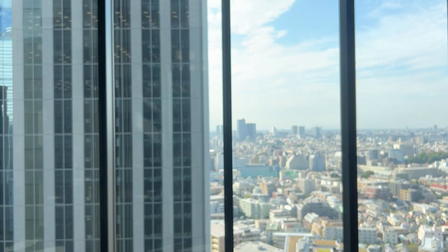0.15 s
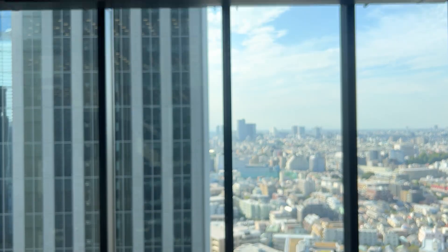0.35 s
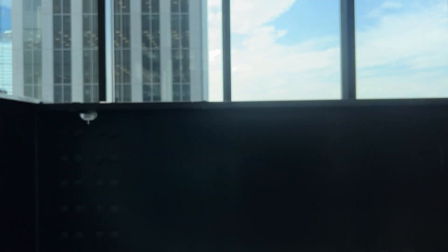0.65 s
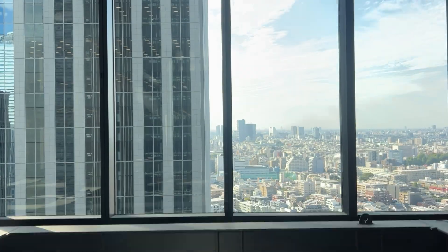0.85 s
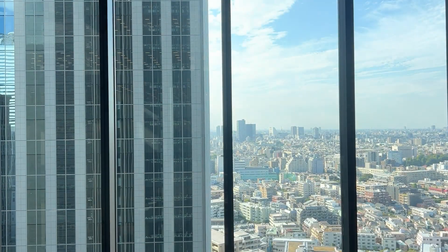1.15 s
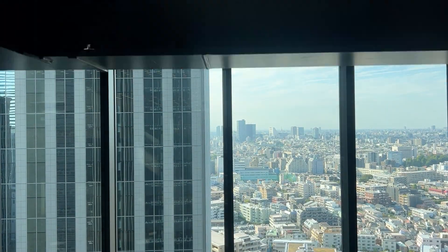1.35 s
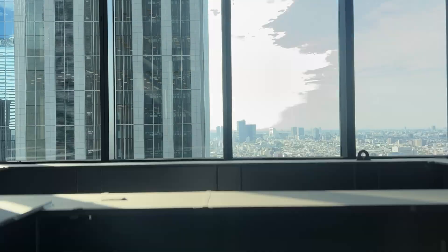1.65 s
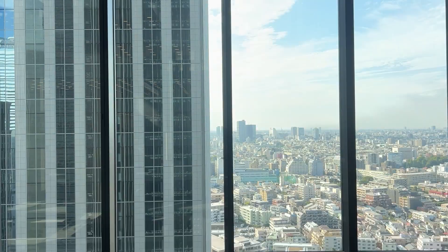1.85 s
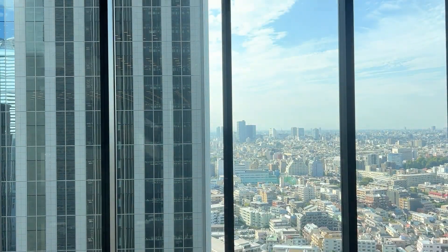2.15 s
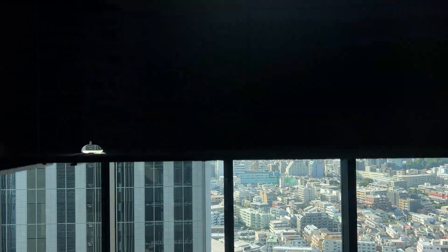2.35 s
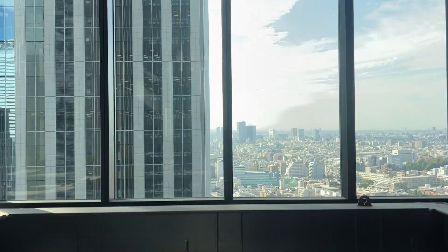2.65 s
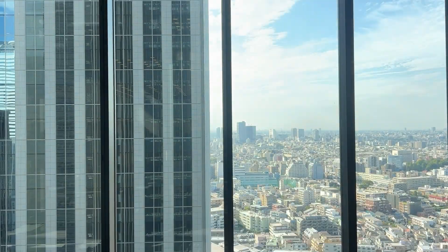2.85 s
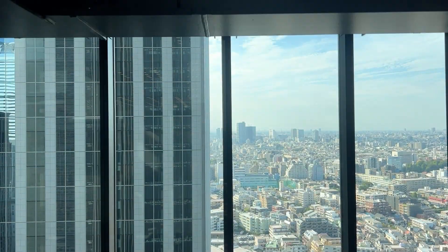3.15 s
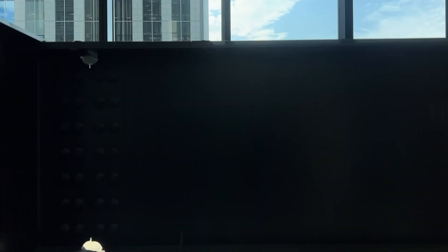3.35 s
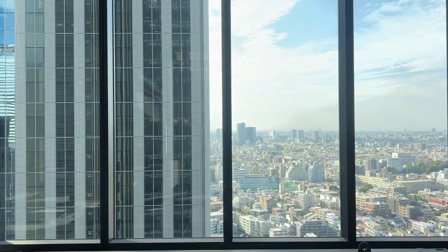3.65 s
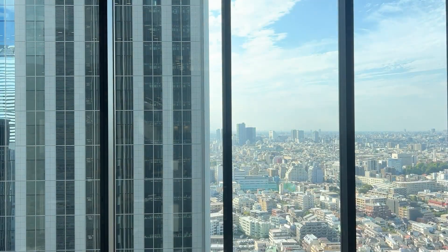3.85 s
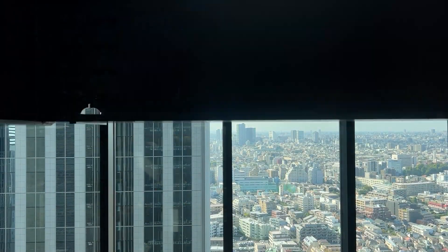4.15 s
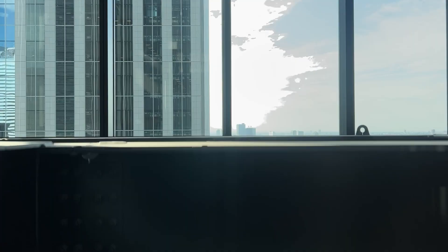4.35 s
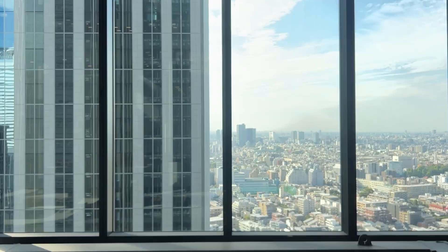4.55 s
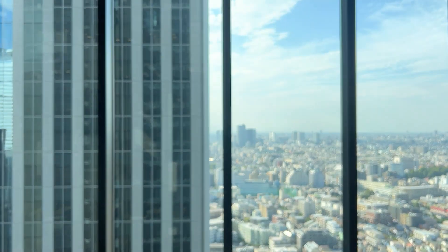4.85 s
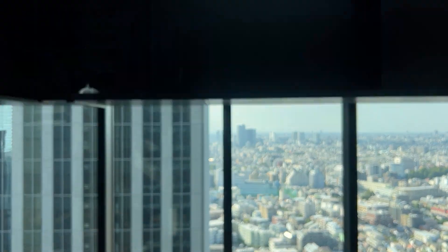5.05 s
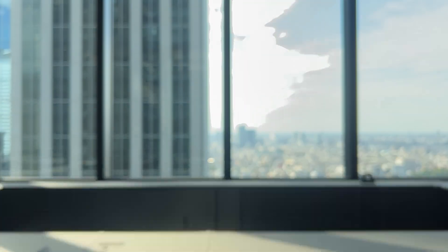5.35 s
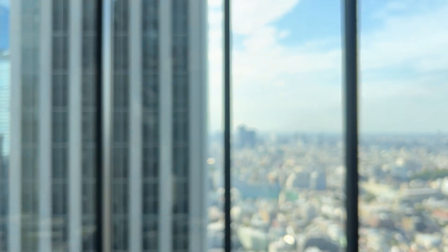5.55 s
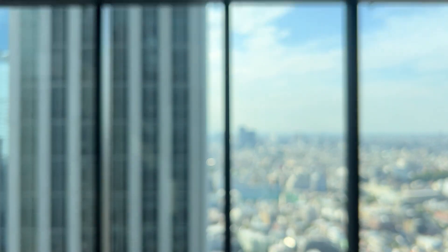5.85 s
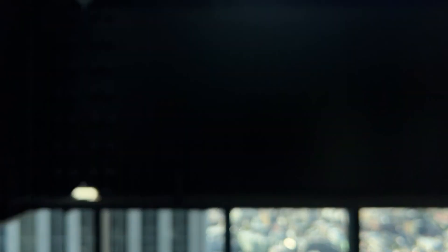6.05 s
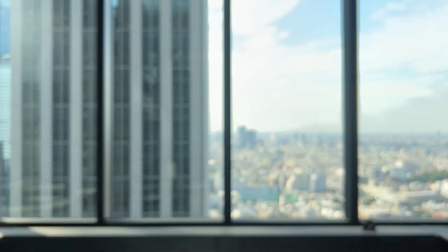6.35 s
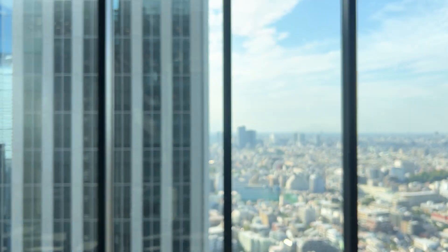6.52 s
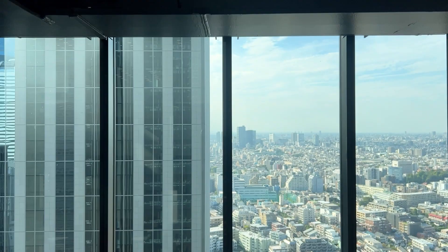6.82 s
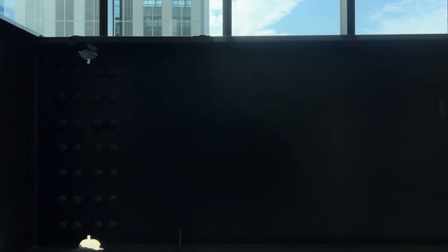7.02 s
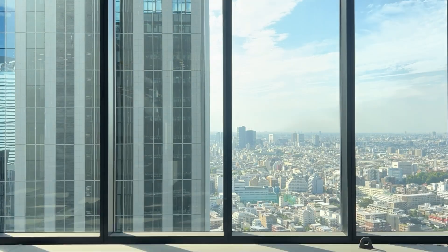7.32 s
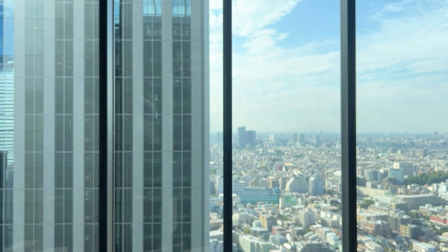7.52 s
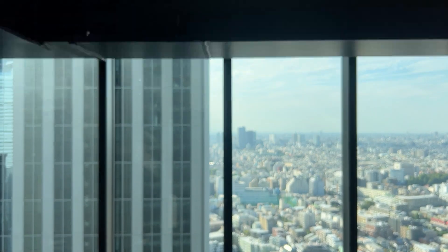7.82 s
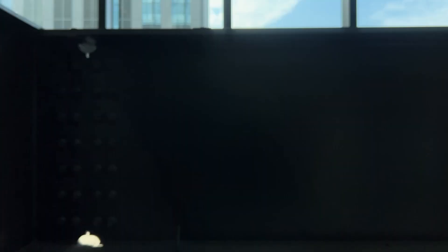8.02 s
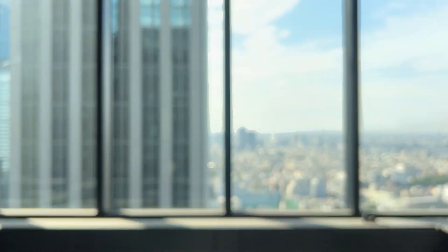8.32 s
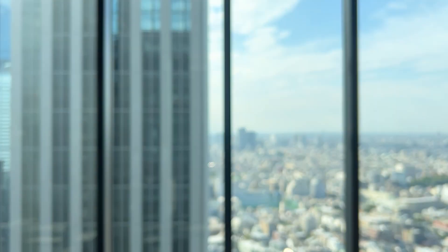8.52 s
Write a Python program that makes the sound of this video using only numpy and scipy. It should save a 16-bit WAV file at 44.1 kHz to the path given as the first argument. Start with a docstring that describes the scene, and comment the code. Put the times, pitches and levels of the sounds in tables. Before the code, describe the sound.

A moving elevator car hums and rumbles steadily from inside, with a few dull knocks, the hum sagging as it slows near the end.

```python
"""Riding a glass elevator

Inside the car as it climbs at speed, on a hand-held two-port microphone. The guide rollers hum through
the car over a low rumble, ringing panels and the hiss of the ventilation. Near the end the car slows:
the hum sags and the air noise grows. Dull knocks, a thin whistle and a few short hisses pass by."""
import sys
import numpy as np
from scipy import signal
from scipy.fft import rfft, irfft, next_fast_len
from scipy.io import wavfile
from scipy.ndimage import uniform_filter1d

SR = 44100
rng = np.random.default_rng(int(sys.argv[2]) if len(sys.argv) > 2 else 0)


def materialize(psi):
    """Save the field psi as 16-bit PCM at rate SR to the path in sys.argv[1].

    A 1-D psi becomes a single channel; in a 2-D psi each row is a channel.
    """
    bounded = np.clip(np.atleast_2d(psi).T, -1, 1)
    quanta = np.round(bounded * 32767).astype(np.int16)
    wavfile.write(sys.argv[1], SR, quanta)


N = 382770

# how alike the car sounds at the two ports: (frequency [Hz], correlation [0-1])
PORT_LIKENESS = [(25, .999), (45, .997), (60, .97), (75, .93), (100, .8), (130, .6), (180, .82), (300, .84),
                 (520, .25), (890, .15), (1520, .4), (2600, .5), (4500, .1), (6000, .25), (8000, .6),
                 (11000, .95)]
# balance at the microphone: (frequency [Hz], left minus right [dB])
PORT_BALANCE = [(30, 2.5), (50, 0.5), (75, 0), (120, -3), (300, 0), (520, -1), (890, 0.5), (1520, -2.5),
                (2600, -4.5), (5000, -4), (7500, -5), (12000, 0.5)]
# rumble of the rollers on the rails: (time [s], level [dB])
RUMBLE_LEVEL = [(0, -39), (.3, -38.5), (1.1, -39.5), (1.5, -39.5), (2.2, -36.5), (2.6, -40), (3.1, -35.5),
                (3.5, -40), (4.3, -38), (4.8, -40), (5.3, -38.5), (5.8, -43), (6.2, -40.5), (7.3, -38.5),
                (7.9, -39.5), (8.45, -42), (8.68, -39.5)]
# bottom end of that rumble: (time [s], level [dB])
BOTTOM_LEVEL = [(0, -43.5), (.7, -43), (1.5, -44), (2.2, -42), (2.9, -44.5), (3.6, -45), (4.3, -39.5),
                (4.9, -40), (5.3, -41), (5.8, -45), (6.2, -40), (6.7, -39.5), (7.3, -41.5), (7.9, -46),
                (8.4, -41), (8.68, -46)]
# ventilation hiss: (time [s], level [dB])
VENT_LEVEL = [(0, -58), (1.6, -58.5), (2.2, -57.5), (3.6, -58), (4.25, -56.5), (4.9, -57.5), (5.5, -55),
              (6.1, -57), (6.9, -53.5), (7.5, -54), (7.9, -54), (8.1, -53), (8.68, -52.5)]


def roller_hum():
    """Multiples of the rollers' turn: one strong hum throbs once a turn, weaker ones swell and fade."""
    # the strong hum: (time [s], level [dB])
    hum_level = [(0, -54), (.3, -34.5), (.75, -38), (1.35, -32.5), (1.75, -37), (2.35, -33.5), (2.9, -38),
                 (3.3, -39.5), (4.25, -34.5), (4.6, -42.5), (5, -33), (5.36, -42), (5.55, -31.5),
                 (6.2, -32.5), (6.4, -34.5), (6.8, -36), (7, -29), (7.27, -29), (7.37, -54.5), (8.1, -44.5),
                 (8.38, -35.5), (8.68, -44)]
    # its throb: (time [s], depth [0-1])
    throb_depth = [(0, 0.43), (3.1, 0.42), (3.5, 0.2), (5.4, 0.09), (7, 0.17)]
    # the weaker lines, before swell and resonance: {multiple of the turn: level [dB]}
    orders = {7: -58, 8: -59, 10: -49.5, 11: -58.5, 13: -54, 14: -59.5, 16: -53.5, 17: -52, 18: -54.5, 22:
              -53.5, 23: -60, 24: -59.5, 25: -59.5, 26: -55, 28: -58, 37: -62.5, 39: -63.5, 48: -65.5}
    cruise_hz, main_order, throb_peak_s = 6.407, 20, 0.1
    brake_s, ease_s, slowing_hz_per_s = 6.9, 0.421, 1.05  # braking builds over ease_s, then holds
    car_hz, car_width_hz = 126.1, 3.2  # the car's main resonance lifts a line sliding through it
    braking = np.maximum(np.arange(N) / SR - brake_s, 0)
    braked_s = np.where(braking < ease_s, braking ** 2 / (2 * ease_s), braking - ease_s / 2)
    turn_hz = cruise_hz - slowing_hz_per_s * braked_s
    turns = np.cumsum(turn_hz) / SR
    throb = 1 + over_time(throb_depth) * np.cos(2 * np.pi * (turns - cruise_hz * throb_peak_s))
    sway, *swells = wander(top_hz=3.0, count=len(orders) + 1)
    main = np.sin(2 * np.pi * (main_order * turns + rng.random()) + 0.28 * sway)
    out = sides(lean_db=-4.5) * gain_of(over_time(hum_level)) * throb * main
    for (order, db), swell in zip(orders.items(), swells):
        lift = 1 + 5 / (1 + ((order * turn_hz - car_hz) / car_width_hz) ** 2)
        line = lift * gain_of(db + 3.1 * swell) * np.sin(2 * np.pi * (order * turns + rng.random()))
        out += sides(at_hz(PORT_BALANCE, order * cruise_hz)) * line
    return np.sqrt(2) * out


def rail_rumble():
    """Rollers running on the rails: a low rumble whose bottom end rises and falls on its own."""
    # colour of the rumble: (frequency [Hz], relative density [dB])
    rumble_colour = [(75, -45), (91, -21.5), (109, -1), (125, -4.5), (210, -16.5), (309, -21), (364, -26),
                     (700, -44), (910, -75.5), (1540, -120)]
    # colour of its bottom end: (frequency [Hz], relative density [dB])
    bottom_colour = [(12, -69), (20, -32.5), (53, -7), (73, 1.5), (91, -17), (105, -44.5), (200, -100)]
    rumble = gain_of(over_time(RUMBLE_LEVEL)) * port_noise(rumble_colour, patchy_db=1.1, size=4096)
    bottom = gain_of(over_time(BOTTOM_LEVEL)) * port_noise(bottom_colour, patchy_db=2.5, size=4096)
    return rumble + bottom


def car_panels():
    """Each panel picks its own narrow band out of the shaking and follows the level of what drives it."""
    # panel resonances: (frequency [Hz], width [Hz], level at average drive [dB])
    panel_modes = [(48.4, 16, -59), (65.2, 1.6, -52), (84.5, 9.8, -50.5), (105.5, 6.1, -45.5),
                   (126.8, 13, -50.5), (181, 6.8, -63), (238.84, 5, -57), (307.9, 7, -58.5), (746, 36, -68),
                   (847, 17, -68.5), (895, 10, -69.5), (1095, 37, -73.5), (1878, 160, -73)]
    bottom_db, rumble_db, vent_db = map(over_time, (BOTTOM_LEVEL, RUMBLE_LEVEL, VENT_LEVEL))
    out = np.zeros((2, N))
    for hz, width, db in panel_modes:
        shake, likeness = rng.standard_normal((2, N)), at_hz(PORT_LIKENESS, hz)
        shake[1] = likeness * shake[0] + np.sqrt(1 - likeness ** 2) * shake[1]
        drive_db = bottom_db if hz < 92 else rumble_db if hz < 700 else .5 * vent_db
        level = gain_of(db + drive_db - drive_db.mean())
        out += level * sides(at_hz(PORT_BALANCE, hz)) * narrow_band(shake, hz, width)
    return out


def knock(db, hz, upper_hz, bright_db, lean_db, drop, thud_db):
    """A blow through a stiff panel: bending waves spread, so the pitch drops fast; body modes ring too."""
    # modes in every knock: (frequency [Hz], relative level [dB], t60 [s], kind [1 bright, 0 thud])
    body_modes = [(125, -3, .11, 0), (200, -3, .05, 0), (320, -6, .03, 0), (3200, -6, .004, 1),
                  (4500, -9, .003, 1), (5600, -13, .003, 1), (7200, -13, .003, 1), (8300, -16, .003, 1)]
    upper_mode = (upper_hz, 12, .007, 1)
    glide_s, t60_cycles, rise_cycles, attack_s = .0032, 11, .9, .0004
    t = np.arange(6000) / SR
    cycles = np.cumsum(hz * (1 + drop * np.exp(-t / glide_s))) / SR
    ring = np.sin(2 * np.pi * cycles) * gain_of(-60 * cycles / t60_cycles)
    for mode_hz, mode_db, t60, bright in body_modes + [upper_mode]:
        swell = 1 - np.exp(-t * mode_hz / rise_cycles)  # low modes swell more slowly
        decay = gain_of(mode_db + (bright_db if bright else thud_db) - 60 * t / t60)
        ring += np.sin(2 * np.pi * mode_hz * t) * swell * decay
    return sides(lean_db) * gain_of(db) * ring * (1 - np.exp(-t / attack_s))


def short_hiss(db, hz, width, rise, hold, t60, lean_db):
    """A brief burst of noise in one steep-sided band, its level flickering quickly."""
    flicker_db = 3.5
    t = np.arange(SR // 2) / SR
    shared, left, right = rng.standard_normal((3, len(t)))
    flicker = gain_of(flicker_db * unit_rms(uniform_filter1d(rng.standard_normal(len(t)), size=50)))
    spectrum = rfft((np.array([left, right]) + 0.16 * shared) * flicker)
    band = np.exp(-((np.fft.rfftfreq(len(t), 1 / SR) - hz) / width) ** 4)
    envelope = np.minimum(t / rise, 1) * gain_of(db - 60 * np.maximum(t - rise - hold, 0) / t60)
    return sides(lean_db) * unit_rms(irfft(spectrum * band, len(t))) * envelope


def whistle():
    """Noise in two close bands, off to the right: a thin whistle that swells, dips and sinks a little."""
    # its bands: (centre [Hz], width [Hz], relative level [dB])
    bands = [(5200, 100, 0), (5020, 150, -3.5)]
    # its swell: (time from its start [s], level [dB])
    whistle_level = [(0, -88), (.05, -73), (.27, -71), (.38, -76), (.47, -73.5), (.62, -73.5), (.67, -79),
                     (.76, -77), (.85, -88), (1, -110)]
    fall_hz_per_s = 110
    t = np.arange(SR) / SR
    air = rng.standard_normal(len(t))
    tone = sum(gain_of(db) * narrow_band(air, hz - fall_hz_per_s * t, width) for hz, width, db in bands)
    return sides(lean_db=-9.5) * gain_of(over_time(whistle_level, len(t))) * unit_rms(tone)


def ventilation():
    """Air in the car: the ventilation's hiss, growing toward the end, and a steady fan overhead."""
    # colour of the ventilation: (frequency [Hz], relative density [dB])
    vent_colour = [(300, -10.5), (400, -1.5), (553, -7), (790, -5.5), (944, -8), (1060, -8), (1350, -13.5),
                   (1840, -9), (2200, -14), (2700, -25), (3200, -59)]
    # colour of the ceiling fan: (frequency [Hz], relative density [dB])
    fan_colour = [(1300, -31), (1800, -6.5), (2200, 3), (2700, -2), (3100, -14), (3600, -46)]
    vent = gain_of(over_time(VENT_LEVEL)) * port_noise(vent_colour, patchy_db=1.1, size=1024)
    fan = gain_of(-66) * port_noise(fan_colour, patchy_db=1.1, size=1024)
    return vent + fan


def door_draught():
    """Air through the door gaps: a high hiss that partly follows the ventilation's level."""
    # colour of the draught: (frequency [Hz], relative density [dB])
    draught_colour = [(2200, -20.5), (2900, -1.5), (3500, -4), (4400, -4), (5300, -6), (6000, -11.5),
                      (6800, -11.5), (7600, -18), (9000, -19.5), (10000, -23), (10800, -45)]
    vent_db = over_time(VENT_LEVEL)
    draught_db = -72 + 0.81 * (vent_db - vent_db[0])
    return gain_of(draught_db) * port_noise(draught_colour, patchy_db=1.3, size=512)


def rustle():
    """A rough, cloth-like rustle in the treble, strongest near the end."""
    # its swells: (time [s], level [dB])
    rustle_level = [(0, -85), (1.1, -87.5), (1.5, -75.5), (1.9, -88), (3.6, -80), (5.1, -78.5), (7, -84),
                    (7.6, -75.5), (8.04, -70.5), (8.06, -64.5), (8.27, -64.5), (8.45, -69), (8.68, -66.5)]
    # its colour: (frequency [Hz], relative density [dB])
    rustle_colour = [(1200, -17), (1650, -9), (1900, 7.5), (2150, -4.5), (3000, -7), (4400, -3.5),
                     (5900, 0), (7000, -5), (8500, -15.5), (10000, -34.5)]
    return gain_of(over_time(rustle_level)) * port_noise(rustle_colour, patchy_db=1.5, size=256)


def high_tones():
    """Faint steady tones, dead centre, that drop back as the car slows."""
    # the tones at full speed: (frequency [Hz], rms level [dB])
    tones = [(8344, -104), (8979, -106), (9475, -103), (9728, -103)]
    t = np.arange(N) / SR
    lines = sum(gain_of(db) * np.sin(2 * np.pi * (hz * t + rng.random())) for hz, db in tones)
    return np.sqrt(2) * lines * np.interp(t, [7.2, 7.5], [1, .3])


def port_noise(colour, patchy_db, size):
    """Noise at the two ports: random short-time spectra with drifting patches, rms 1 in mono."""
    frames, hz = 4 * N // size + 5, np.fft.rfftfreq(size, 1 / SR)
    left_re, left_im, apart_re, apart_im, patches = rng.standard_normal((frames, len(hz), 5)).T
    patches = uniform_filter1d(patches, size=size // 100, axis=0)  # smooth across frequency
    patches = unit_rms(uniform_filter1d(patches, size=8192 // size, axis=1))  # and across time
    likeness, lean = at_hz(PORT_LIKENESS, hz)[:, None], gain_of(at_hz(PORT_BALANCE, hz)[:, None] / 2)
    left = left_re + 1j * left_im
    right = likeness * left + np.sqrt(1 - likeness ** 2) * (apart_re + 1j * apart_im)
    spectra = np.array([left * lean, right / lean])
    spectra *= gain_of(at_hz(colour, hz)[:, None] + patchy_db * patches)
    noise = signal.istft(spectra, nperseg=size, noverlap=3 * size // 4)[1][:, :N]
    return noise / np.sqrt(np.mean(noise.mean(0) ** 2))


def narrow_band(x, hz, width):
    """Two passes through a resonance at hz, which may glide; rms 1."""
    carrier = np.exp(2j * np.pi * np.cumsum(hz * np.ones(x.shape[-1])) / SR)
    pole = np.exp(-np.pi * width / SR)
    for _ in range(2):  # shift hz down to zero, smooth, shift back
        x = 2 * (carrier * signal.lfilter([1 - pole], [1, -pole], x / carrier)).real
    return unit_rms(x)


def wander(top_hz, count):
    """Slow random curves, rms 1."""
    t, hz = np.arange(0, N, 100) / SR, np.geomspace(top_hz / 8, top_hz, num=12)[:, None]
    curves = (np.sin(2 * np.pi * (hz * t + rng.random((count, 12, 1)))) / np.sqrt(hz)).sum(1)
    return np.array([np.interp(np.arange(N) / SR, t, unit_rms(curve)) for curve in curves])


def gain_of(db):
    """Decibels to gain."""
    return 10 ** (np.asarray(db) / 20)


def unit_rms(x):
    """Scales to rms 1."""
    return x / np.sqrt(np.mean(x ** 2) + 1e-20)


def over_time(points, samples=N):
    """Reads (time, value) points at every sample."""
    return np.interp(np.arange(samples) / SR, *np.transpose(points))


def at_hz(points, hz):
    """Reads (frequency, value) points on a log-frequency axis."""
    point_hz, value = np.transpose(points)
    return np.interp(np.log(hz + 1), np.log(point_hz + 1), value)


def sides(lean_db):
    """Left and right gains for a level of left minus right."""
    return gain_of([[lean_db / 2], [-lean_db / 2]])


def add(mix, start_s, sound):
    """Lays a two-channel sound into the mix."""
    part = mix[:, round(start_s * SR):][:, :sound.shape[1]]
    part += sound[:, :part.shape[1]]


def scene():
    """The ride as heard from inside the car."""
    # dull knocks, mostly to the right: (time [s], ring level [dB], settled ring [Hz], upper mode [Hz],
    # bright modes [dB], left minus right [dB], pitch drop [share of settled ring], thud modes [dB])
    knocks = [(2.812, -41, 450, 1800, -30, 0, 0.58, -4), (3.117, -34, 292, 1810, -30, -4, 0.29, -3),
              (3.67, -21, 289, 1390, -12.5, -7, 2.56, 6), (3.684, -26.5, 900, 1770, -9.5, -10, .15, -7),
              (3.96, -43, 796, 1800, -24, -9, 0.22, -4), (4.112, -29, 480, 1400, -28, -8, 0.69, -6),
              (4.218, -38, 890, 1900, -22, -10, 0.083, -5), (4.243, -34.5, 450, 1800, -29, -8, 0.89, 7),
              (4.717, -35, 418, 1800, -28, -5, 0.38, -6), (5.3143, -39, 700, 1500, -18, -14, 0.34, 4),
              (5.3265, -23.5, 410, 1860, -16, -7, 1.08, -1), (5.7538, -30.5, 422, 1790, -28, -4, 0.46, 6),
              (8.2, -38, 497, 1800, -22, -2, 0.83, 7), (8.312, -26, 430, 1330, -18, -5, 1.17, -0.5)]
    # passing hisses: (time [s], level [dB], centre [Hz], half-width [Hz], rise [s], hold [s], t60 [s],
    # left minus right [dB])
    hisses = [(1.679, -55.5, 1320, 398, 0.004, 0.036, 0.35, -2),
              (5.616, -70.5, 5860, 2210, 0.012, 0.029, 0.2, -9),
              (6.234, -67, 7900, 2300, 0.006, 0.042, 0.21, -0.5),
              (6.236, -83, 11900, 800, .005, .025, .12, -1), (6.236, -69, 6640, 250, .005, .035, .08, -8),
              (6.229, -66.5, 4300, 500, .004, .012, .06, -5),
              (6.287, -79, 8700, 1590, .015, 0.023, 0.14, -6),
              (6.677, -59, 1602, 600, 0.025, 0.03, 0.2, -6), (7.077, -68, 8900, 1700, .003, 0.02, 0.4, 1),
              (7.076, -85, 12200, 900, .003, .012, .1, -1),
              (7.327, -79, 7200, 2020, 0.019, 0.028, 0.18, -3),
              (7.857, -73, 6700, 1500, 0.036, 0.031, 0.35, -4),
              (8.053, -64, 6000, 3800, .001, .004, 0.055, -1),
              (8.054, -84, 12000, 900, .002, .006, .08, -2), (8.052, -51, 1090, 900, .01, 0.023, 0.28, 0)]
    mix = rail_rumble() + car_panels() + ventilation() + door_draught() + rustle()
    mix += roller_hum() + high_tones()
    add(mix, start_s=3.08, sound=whistle())
    for start_s, *blow in knocks:
        add(mix, start_s, knock(*blow))
    for start_s, *burst in hisses:
        add(mix, start_s, short_hiss(*burst))
    return mix


def record(dry):
    """Quick end fades, a lag at the microphone's left port, a faint top hiss and a band limit."""
    # colour of a faint, very high steady hiss: (frequency [Hz], relative density [dB])
    top_hiss_colour = [(7000, -22), (9500, -2.5), (10500, -19.5), (11300, 4), (11800, 8.5), (12800, -1),
                       (14000, -22)]
    fade_s, left_lag_s, top_hiss_db, top_hz = .002, 3e-5, -95.5, 13400
    t = np.arange(N) / SR
    fade = np.sin(np.pi / 2 * np.clip(np.minimum(t, t[::-1]) / fade_s, 0, 1)) ** 2
    size = next_fast_len(N + 1024)
    delay = np.exp(-2j * np.pi * np.fft.rfftfreq(size, 1 / SR) * np.array([[left_lag_s], [0]]))
    heard = irfft(rfft(dry * fade, size) * delay, size)[:, :N]
    heard += fade * gain_of(top_hiss_db) * port_noise(top_hiss_colour, patchy_db=1.5, size=512)
    lowpass = signal.firwin(511, top_hz, window=("kaiser", 9), fs=SR)
    return signal.oaconvolve(heard, lowpass[None], "same")


dry = scene()
out = record(dry)
materialize(out)
```